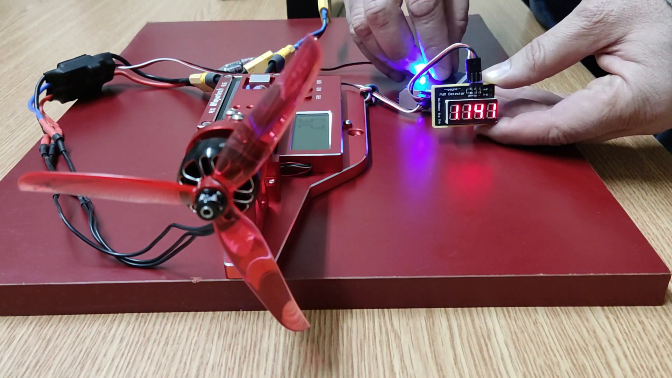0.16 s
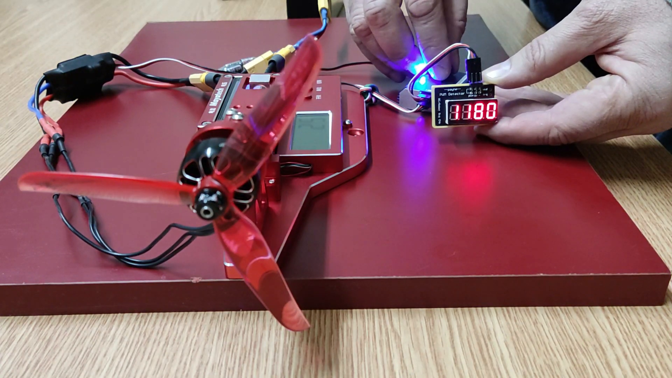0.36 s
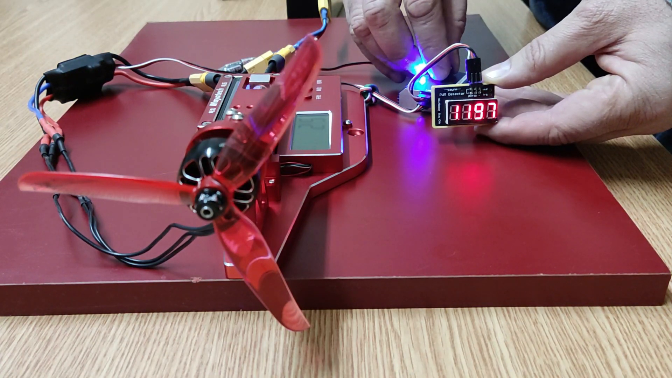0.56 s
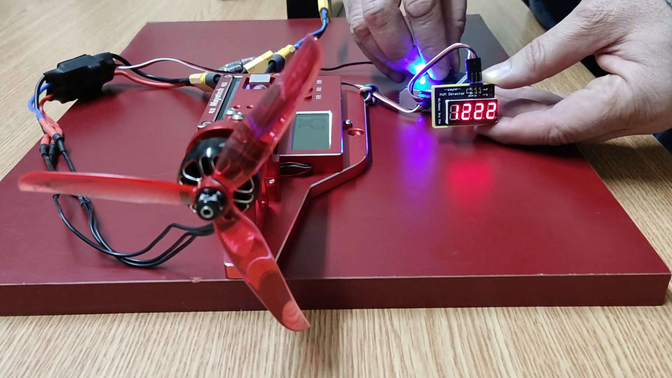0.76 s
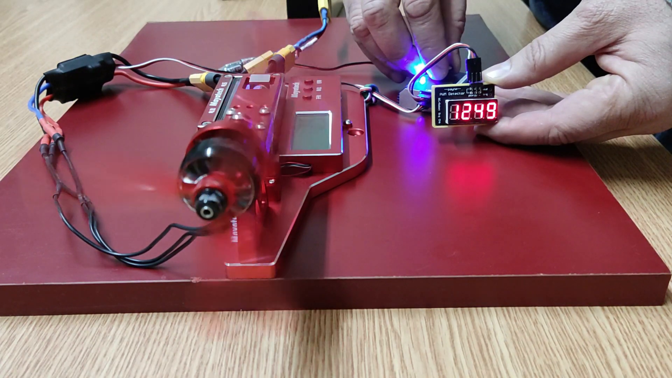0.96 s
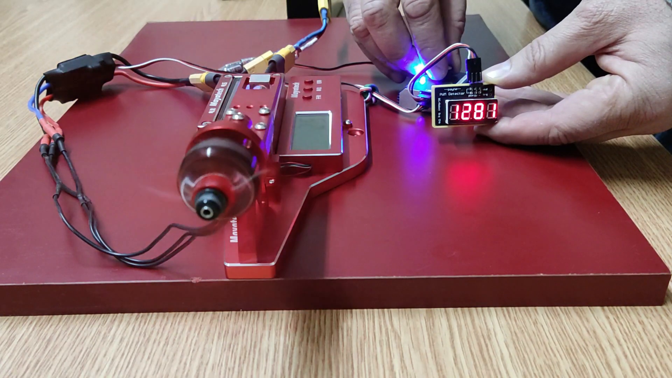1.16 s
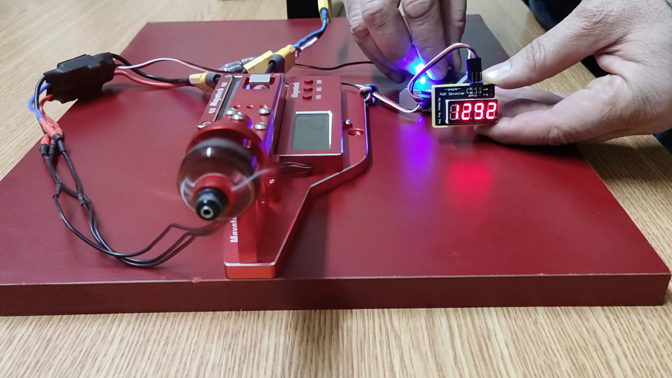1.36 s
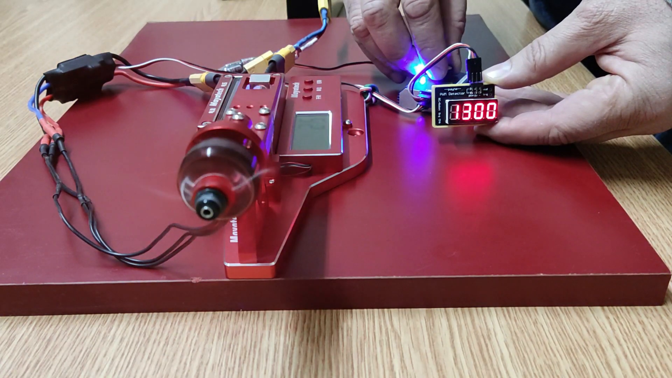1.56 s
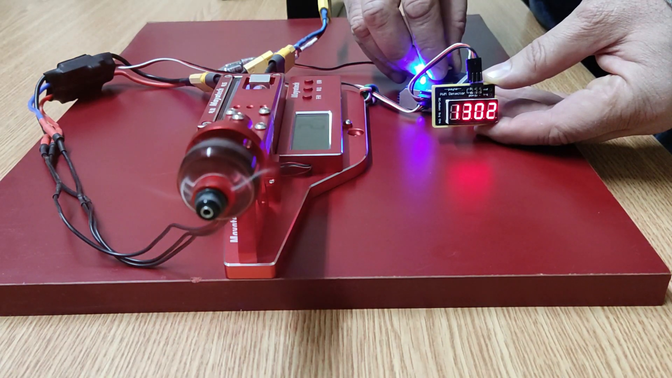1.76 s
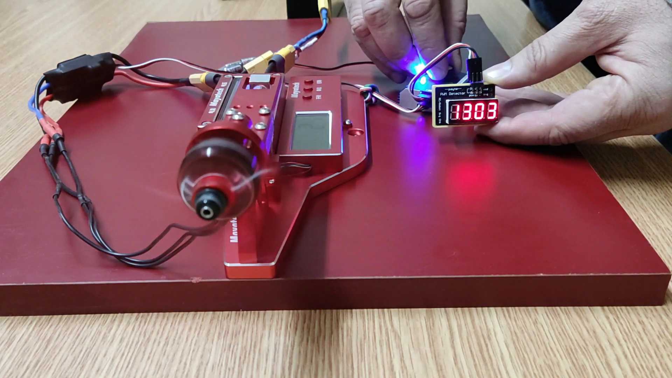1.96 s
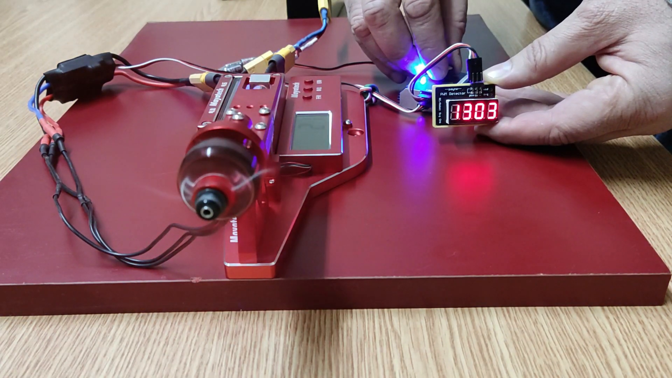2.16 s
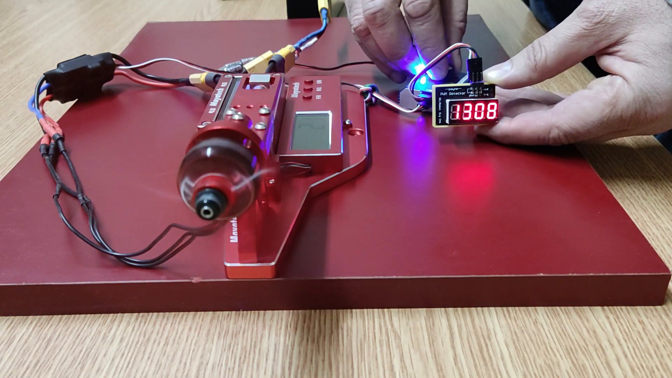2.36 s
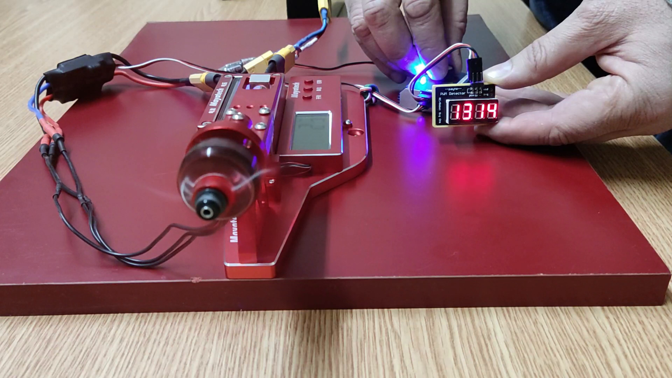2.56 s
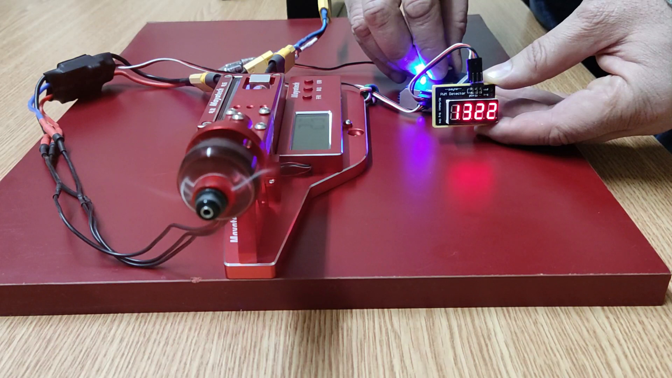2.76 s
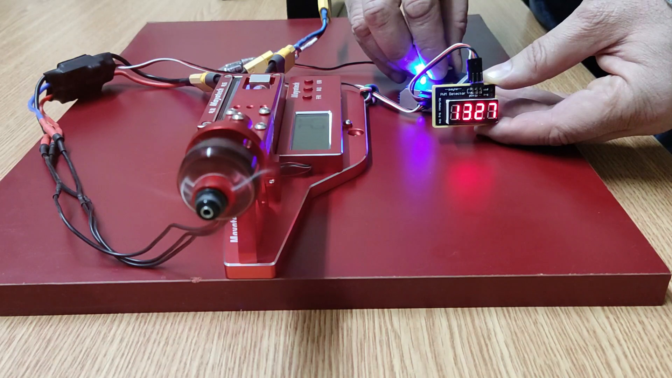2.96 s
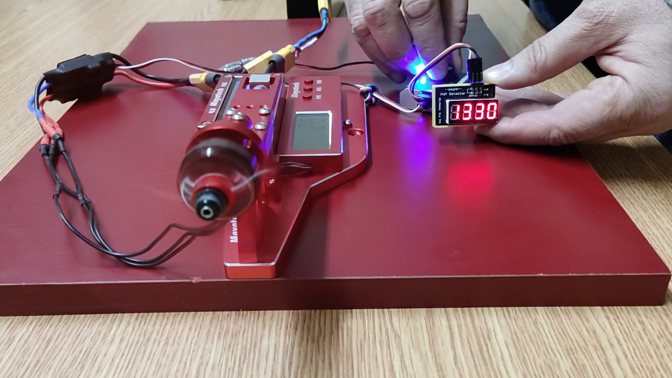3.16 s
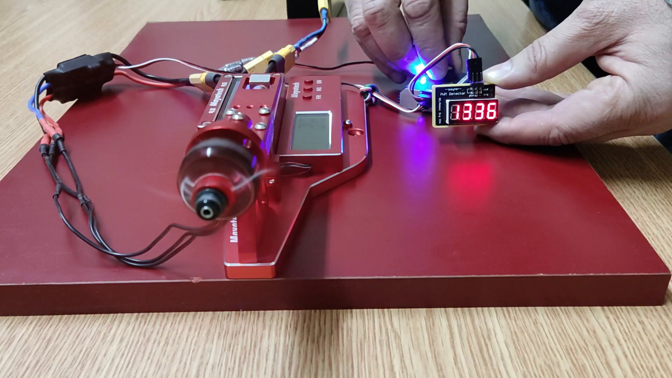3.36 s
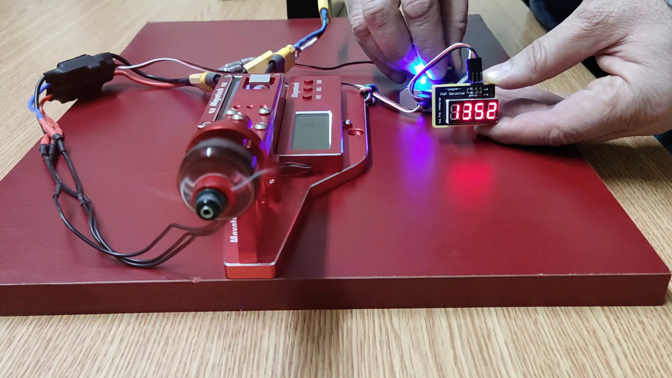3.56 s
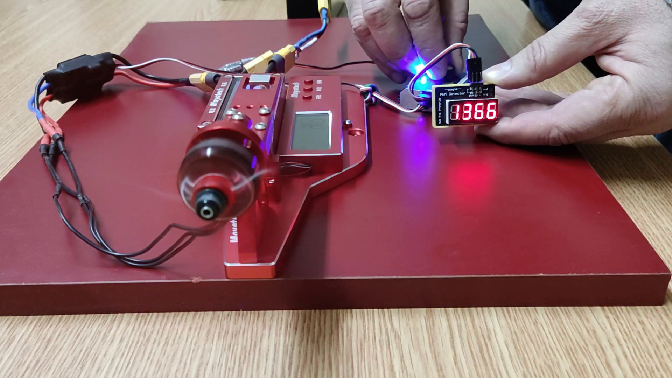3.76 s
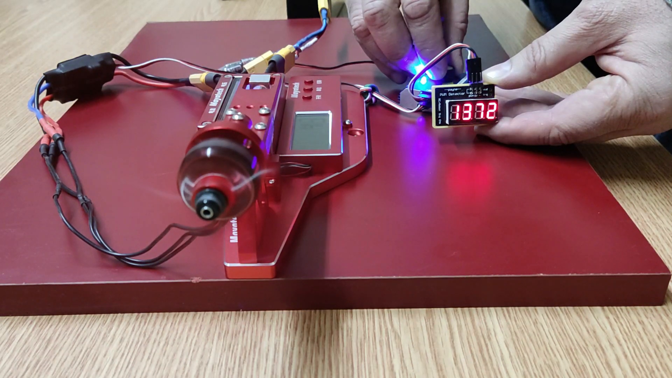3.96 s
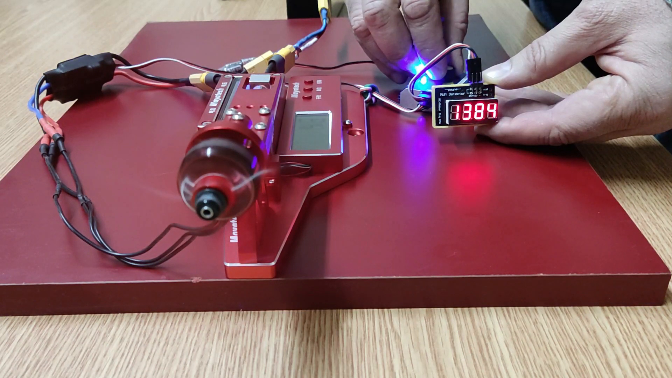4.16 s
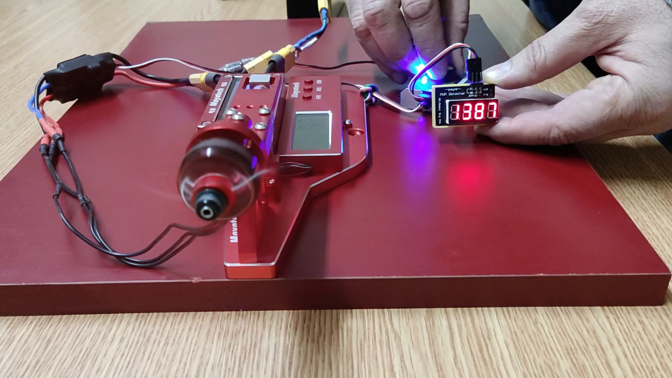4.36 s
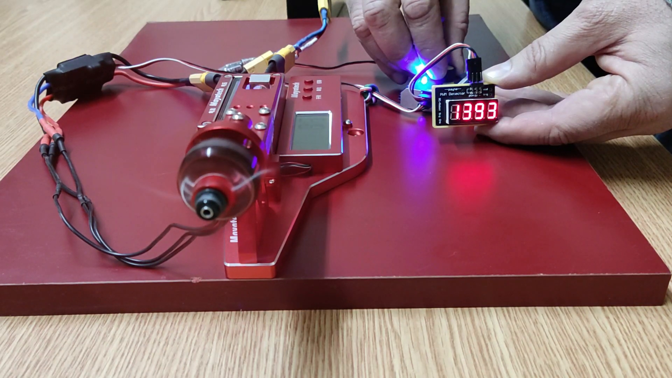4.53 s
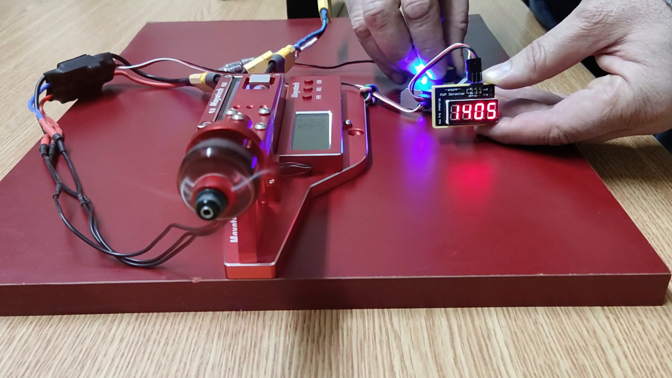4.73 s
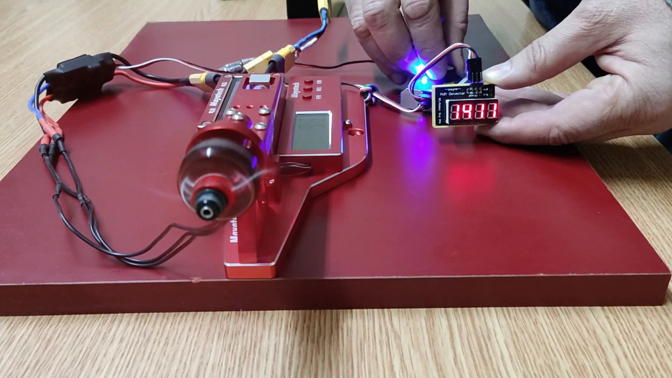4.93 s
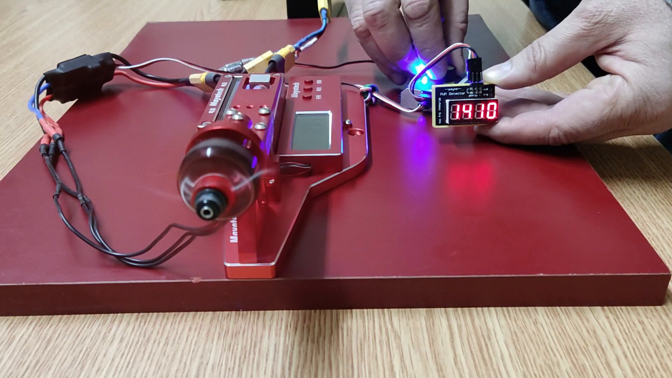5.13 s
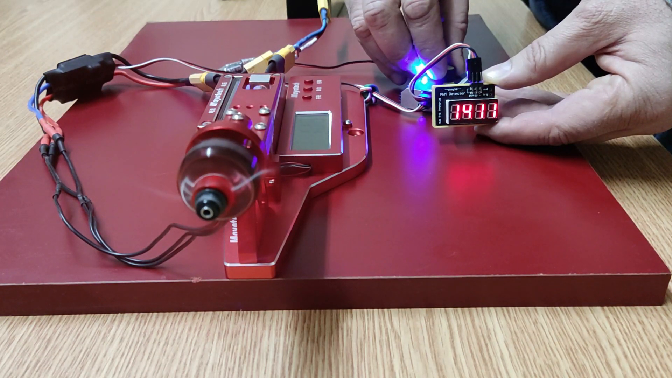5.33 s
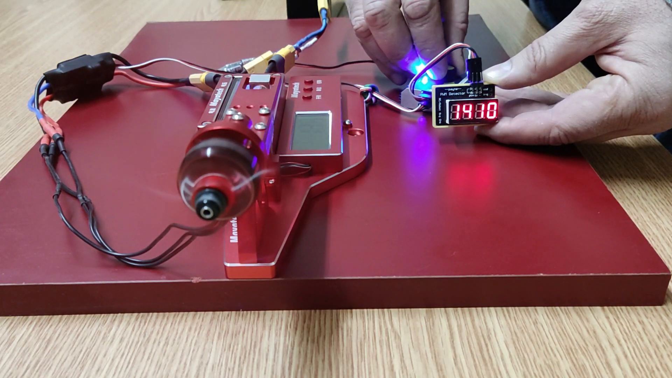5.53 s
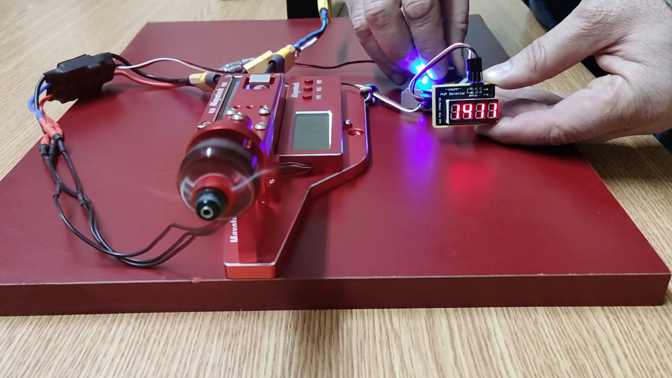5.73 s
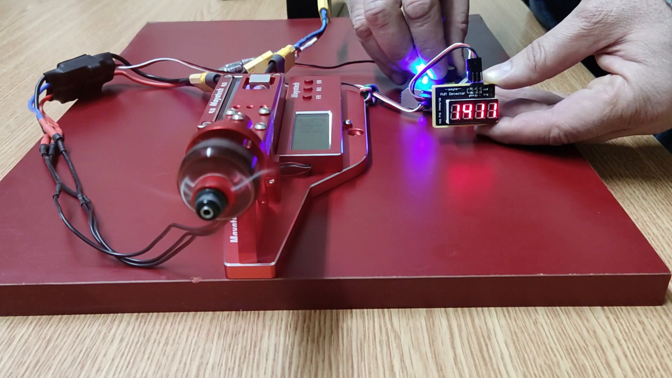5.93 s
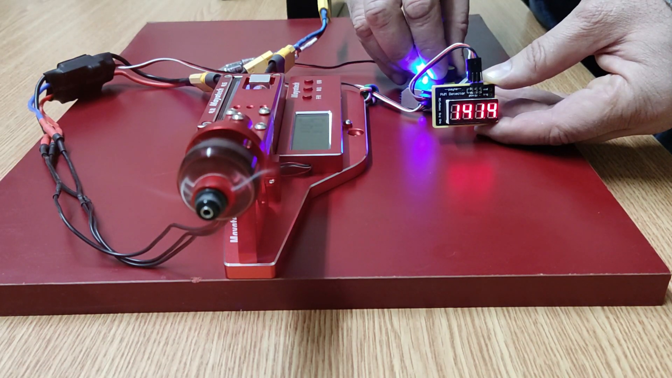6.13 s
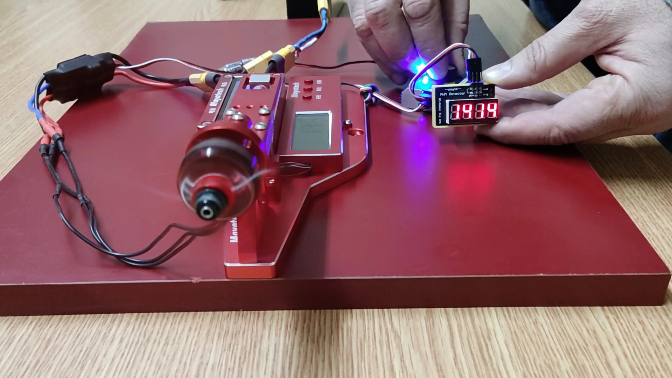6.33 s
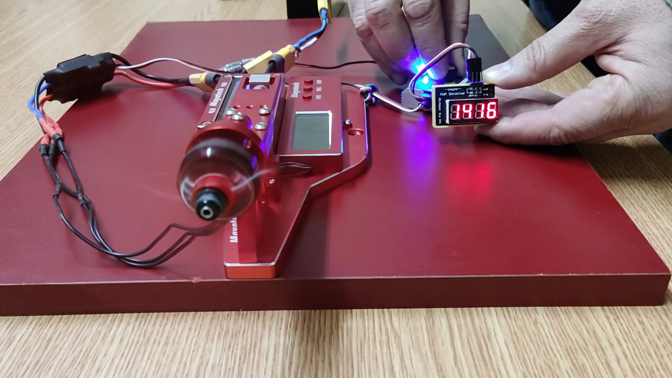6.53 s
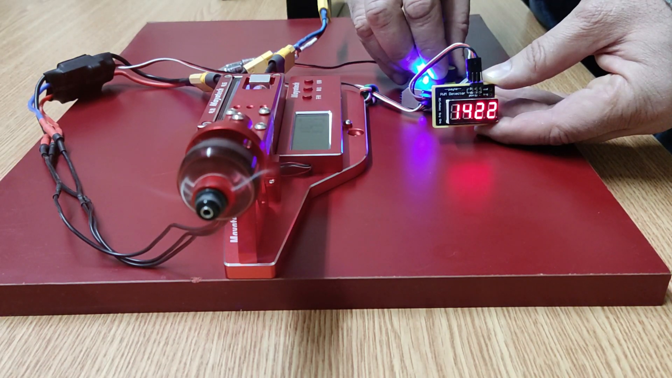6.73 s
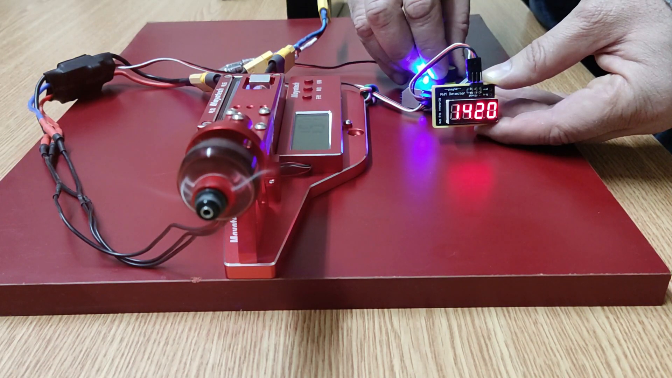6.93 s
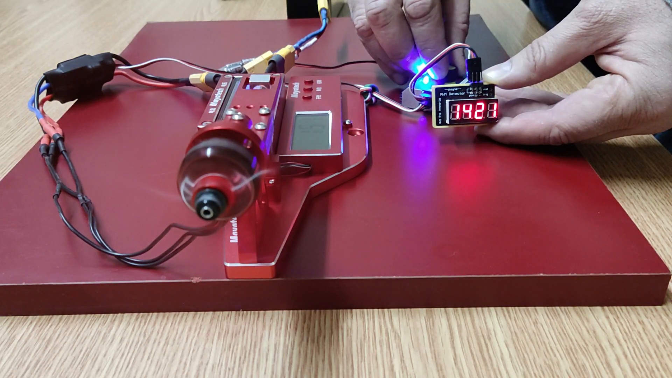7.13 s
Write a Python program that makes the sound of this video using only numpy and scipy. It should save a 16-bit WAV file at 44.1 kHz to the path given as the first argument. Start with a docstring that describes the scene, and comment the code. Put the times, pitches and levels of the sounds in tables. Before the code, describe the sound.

After a second of near-silence, a small brushless motor ticks, stutters, kicks into spin and climbs in steps to a steady, hissing high whine.

```python
"""A small brushless motor with a three-blade propeller on a bench stand in a small room, close to a phone.
It ticks and stutters into step, kicks, overshoots and climbs in stages to a nearly steady speed.
Motor: chopped current whistles with sidebands at multiples of the shaft rate; magnets whine, the bell knocks.
Propeller: blade harmonics hum, and filtered noise gives an air hiss that grows with speed.
Two microphone ports hear it with different delays and levels, over a faint room tone."""
import sys
import numpy as np
from scipy import signal
from scipy.fft import rfft, irfft, next_fast_len
from scipy.io import wavfile
from scipy.ndimage import uniform_filter1d

SR = 44100
rng = np.random.default_rng(int(sys.argv[2]) if len(sys.argv) > 2 else 0)


def inscribe(sig):
    """Save sig as 16-bit PCM at rate SR to the path in sys.argv[1].

    A 1-D sig is mono; a 2-D sig holds one channel per row.
    Samples are clipped to [-1, 1] before scaling.
    """
    pcm = np.round(np.clip(np.atleast_2d(sig).T, -1, 1) * 32767)
    wavfile.write(sys.argv[1], SR, pcm.astype(np.int16))


N = 321489
TIME = np.arange(N) / SR  # s
BINS = np.fft.rfftfreq(N, 1 / SR)  # Hz
POLES, BLADES, STEPS_PER_TURN = 14, 3, 42
# the start: a slow forced ramp, a kick that overshoots, a coast down to the throttle's speed
START_S, KICK_S, COAST_S, SETTLED_S = 1.053, 1.342, 1.365, 1.47
RAMP_HZ, RAMP_CURVE, OVERSHOOT_HZ = 49, .7, 17
# drive current: chopping rate at rest, and its fall in Hz per Hz of shaft speed
SWITCH_HZ, SWITCH_SAG = 7829, .885

# shaft speed under throttle: time_s, speed_hz [s, turns per second]
THROTTLE_SPEED = [(1.52, 60), (1.75, 66.3), (2.0, 71.3), (2.47, 72.74), (2.65, 78), (2.8, 85.4),
                  (2.99, 91.06), (3.17, 94.6), (3.3, 95.56), (3.39, 98.8), (3.5, 101.1), (3.6, 105.7),
                  (3.95, 128.3), (4.02, 132), (4.25, 136.8), (4.35, 139.7), (4.45, 143.4), (4.7, 150.4),
                  (4.85, 158), (4.97, 162.3), (5.2, 164.8), (5.62, 163.9), (5.95, 165.8), (6.1, 165.8),
                  (6.25, 167.8), (6.52, 167.6), (6.82, 172.9), (7.25, 174.5)]


def shaft_speed():
    """Forced ramp, kick and overshoot, then the speed follows the throttle, slightly unsteady."""
    throttle, = curves(THROTTLE_SPEED)
    ramp = RAMP_HZ * np.interp(TIME, [START_S, KICK_S], [0, 1]) ** RAMP_CURVE
    running = throttle + np.interp(TIME, [COAST_S, SETTLED_S], [OVERSHOOT_HZ, 0])
    kicked = np.interp(TIME, [KICK_S, COAST_S], [0, 1])
    return (ramp + kicked * (running - ramp)) * (1 + 0.000396 * wander(14))


# controller stages, each held until the next: start_s, knocking_db, whistle_db, hiss_db [s, dB, dB, dB]
CONTROLLER_STAGES = [(1.054, -43, -63, 0), (1.064, -49, -62, 0), (1.085, -41.5, -67, 0),
                     (1.14, -36.5, -70, 0), (1.158, -31.5, -67, 0), (1.18, -35.5, -78, 0),
                     (1.343, -59, -3.5, -6), (1.348, -26, -0.5, 1.5), (1.365, -39, -10.5, -4.5),
                     (1.448, -36.5, -3.8, -5.5), (1.6, -44, -3, -3.5)]
STAGE_SLEW_S = .003


def staged():
    """Gains of the knocking, the whistle and the hiss: silent at first, then stepping from stage to stage."""
    start_s, *columns = np.transpose(CONTROLLER_STAGES)
    stage = np.searchsorted(start_s, TIME)
    slew = int(STAGE_SLEW_S * SR)
    return [uniform_filter1d(np.append(0, undb(db))[stage], slew) for db in columns]


# switching tone over speed, before the stage gain: speed_hz, level_db, left_minus_right_db [turns/s, dB, dB]
CARRIER_BY_SPEED = [(59, -30, -4), (71.5, -30.5, 3), (87, -25.5, -12.5), (104.05, -19, 8),
                    (120.9, -24.5, 9.5), (126.7, -15.5, 15.5), (139.3, -18.5, 20), (142, -23, 28),
                    (164, -28, 55)]
# throb of the switching tone once a turn: speed_hz, depth [turns per second, 0-1]
THROB_BY_SPEED = [(72, .85), (110, .2)]
# brief dropouts of the switching tone: time_s, half_length_s [s, s]
WHISTLE_DROPOUTS = [(1.705, .009), (1.792, .013), (1.834, .009)]
# weaker sidebands, before the fade with speed: shaft_order, level_db, left_minus_right_db [multiple, dB, dB]
WEAK_SIDEBANDS = [(-28, -43, -4), (-14, -27, -11), (-11, -43, -3), (-3, -29, -9), (3, -37, -9),
                  (6, -37, -7), (8, -39, -16), (10, -40, -8), (11, -30, -16), (12, -38, -9), (13, -35, -10),
                  (17, -41, -6), (28, -44, 0), (39, -38, 12), (42, -26, 15)]
# fade of all sidebands as the throttle opens: speed_hz, gain_db [turns per second, dB]
SIDEBAND_FADE = [(62, 3), (70, 1), (80, -1.5), (135, -1), (150, -7), (174, -13)]
UPPER_DB, UPPER_PAN_DB = -15.5, -16  # loudest sideband, one pole rate above the tone, before the fade
CONTROL_HZ = 3900


def switching(speed, turns, loop_depth=0.19, side_db=0):
    """Chopped drive current sings in the bell; the turning rotor splits it into sidebands."""
    carrier = switching_cycles(speed)
    main_db, main_pan_db = by_speed(CARRIER_BY_SPEED, speed)
    fade_db, = by_speed(SIDEBAND_FADE, speed)
    throb_depth, = by_speed(THROB_BY_SPEED, speed)
    throb = 1 + throb_depth * np.sin(2 * np.pi * turns)
    held = 1 - sum(np.exp(-((TIME - s) / half_s) ** 4) for s, half_s in WHISTLE_DROPOUTS)

    sidebands = pan(UPPER_PAN_DB) * tone(carrier + POLES * turns, UPPER_DB, smear=0.11)
    for order, db, pan_db in WEAK_SIDEBANDS:
        line = pan(pan_db) * tone(carrier + order * turns, db + side_db, smear=0.16)
        # the nearest sidebands drop out together with the tone
        sidebands += line * held if abs(order) <= BLADES else line

    main = pan(main_pan_db) * tone(carrier, main_db, smear=.1) * throb * held
    whistle = radiate(main + undb(fade_db) * sidebands)
    control_ripple = 1 + loop_depth * np.sin(2 * np.pi * CONTROL_HZ * TIME)  # control loop ripples the current
    _, whistle_gain, _ = staged()
    return whistle_gain * whistle * control_ripple


def switching_cycles(speed):
    """Running count of switching cycles; the switching slows a little under load."""
    return np.cumsum(SWITCH_HZ - SWITCH_SAG * speed) / SR


# magnet whine at full speed, before its trim: time_s, level_db [s, dB]
MAGNET_WHINE = [(1.5, -30.5), (2.7, -25), (3.3, -34), (3.8, -28.5), (4.3, -36), (4.75, -21.5),
                (4.86, -25.5), (5.03, -27.5), (5.22, -22.5), (5.3, -26), (5.4, -23.5), (5.66, -28),
                (5.9, -32), (6.0, -24.5), (6.11, -32.5), (6.23, -26.5), (6.55, -27.5), (6.72, -27.5),
                (6.85, -26.5)]
# unevenness of the magnetic pull over one turn, added to the pole tone's neighbours: time_s, gain_db [s, dB]
UNEVEN_PULL = [(3.6, -4), (4.3, -6), (4.8, 2), (5.66, -1.5), (5.74, 8), (6.5, -1.5), (7.29, -10.5)]
# blade and motor harmonics at full speed, before the stand's response: shaft_order, level_db [multiple, dB]
SHAFT_HARMONICS = [(1, -56), (2, -60.5), (3, -42.5), (6, -46), (9, -46), (12, -40.5), (13, -45.5),
                   (15, -36.5), (16, -41.5), (18, -41), (21, -38.5), (24, -39.5), (27, -40.5), (28, -36.5),
                   (29, -42.5), (30, -37), (33, -38.5), (36, -38.5), (39, -43), (42, -34), (70, -46)]
POLE_DB = -1.5  # trim of the magnet whine
POLE_SMEAR, MOTOR_SMEAR = .28, .7
FLUTTER_DB, FLUTTER_HZ = 3, 16  # the uneven pull flutters
WHINE_DIP_S, WHINE_DIP_WIDTH_S, WHINE_DIP_DB = 5.685, 0.019, -35  # the whine dips briefly
FULL_SPEED_HZ = 168
MOTOR_DB_PER_OCTAVE, BLADE_DB_PER_OCTAVE = 12.5, 11.5  # tones grow with speed


def rotor(speed, turns, blade_smear=2.6, blur_hz_per_order=5.5, slow_pan_db=-4, fast_pan_db=2):
    """Harmonics of the shaft: magnet poles whine cleanly, eddies blur the upper blade tones."""
    uneven_db = curves(UNEVEN_PULL)[0] + FLUTTER_DB * wander(FLUTTER_HZ)
    dip_db = WHINE_DIP_DB * np.exp(-((TIME - WHINE_DIP_S) / WHINE_DIP_WIDTH_S) ** 2)
    octaves = np.log2(speed / FULL_SPEED_HZ + 1e-9)
    motor_growth_db, blade_growth_db = MOTOR_DB_PER_OCTAVE * octaves, BLADE_DB_PER_OCTAVE * octaves
    running = np.interp(TIME, [COAST_S, SETTLED_S], [0, 1])  # harmonics fade in during the coast

    whine_db = POLE_DB + curves(MAGNET_WHINE)[0] + dip_db + motor_growth_db
    tones = tone(POLES * turns, whine_db, POLE_SMEAR, smear_hz=90)
    for order, db in SHAFT_HARMONICS:
        # multiples of the blade count, unless on or beside a multiple of the pole rate
        from_blades = order % BLADES == 0 and 2 < order % POLES < POLES - 1
        smear = (blade_smear if from_blades else MOTOR_SMEAR) * min(order / 16, 1) ** 1.65
        smear_hz = max(blur_hz_per_order * order, 70) if from_blades else 70
        db = db + (blade_growth_db if from_blades else motor_growth_db)
        if abs(order - POLES) == 1:  # an uneven pull once a turn puts neighbours beside the pole tone
            db = db + uneven_db + dip_db
        tones += running * tone(order * turns, db, smear, smear_hz)

    sides = pan(np.interp(speed, [90, 130], [slow_pan_db, fast_pan_db]))
    return sides * radiate(tones + bearing(speed, turns))


# high overtones of the magnetic pull: pole_multiple, level_db [multiple of the pole rate, dB]
RISING_OVERTONES = [(4, -40.5), (5, -43), (6, -42), (7, -39.5)]
# sidebands below twice the switching tone: pole_multiple, level_db [multiple of the pole rate, dB]
FALLING_SIDEBANDS = [(1, -55), (3, -49)]
# bell response they sweep through: pitch_hz, half_width_hz, lift_db, left_minus_right_db [Hz, Hz, dB, dB]
BELL_SWEEP = [(4800, 880, -26, 2), (7600, 94, 21, -3), (8520, 93, 17, -24), (11200, 670, 18.5, 28),
              (14700, 1200, -28, 0)]


def overtones(speed, turns):
    """High whines cross, flaring as each meets a resonance of the bell."""
    carrier = switching_cycles(speed)
    rising = sum(tone(k * POLES * turns, db, smear=0.58) for k, db in RISING_OVERTONES)
    falling = sum(tone(2 * carrier - k * POLES * turns, db, smear=0.36) for k, db in FALLING_SIDEBANDS)
    rising_gain = np.interp(speed, [62, 88], [0, 1])
    falling_gain = np.interp(speed, [80, 90], [0, 1])
    return radiate(rising * rising_gain + falling * falling_gain, BELL_SWEEP)


# first jerks of the rotor, before the common lift tick_db: time_s, level_db [s, dB]
ROTOR_TICKS = [(1.056, -31), (1.0825, -35), (1.088, -28), (1.093, -36), (1.1, -28), (1.107, -30),
               (1.114, -24), (1.122, -38), (1.154, -33)]
# resonances of motor bell and mount, relative levels: pitch_hz, width_hz, level_db [Hz, Hz, dB]
BELL_MODES = [(186, 56, -4), (415, 79, -14), (1180, 60, -10), (1670, 25, -1), (2520, 120, -8),
              (3550, 350, -14), (4650, 400, -24), (6000, 150, -17), (7720, 100, 1.5), (8550, 240, -1.5),
              (10750, 310, -6), (11000, 180, -3)]
# magnets' groan during the forced ramp: time_s, level_db [s, dB]
MAGNET_GROAN = [(1.12, -85), (1.15, -58), (1.17, -45), (1.195, -53), (1.23, -54), (1.29, -53), (1.35, -54),
                (1.4, -120)]


def start_up(turns, scatter_db=5, slip=0.14, rattle=0.21, crack=0.02, tick_db=12, pan_db=-4, stutter_db=2.0):
    """Single jerks, then uneven commutation steps, knock the bell; forced current drags the magnets round."""
    t = np.arange(N // 200) / SR
    ring = np.zeros(len(t))
    for hz, width_hz, db in BELL_MODES:
        decay = np.exp(-np.pi * width_hz * t)
        ring += undb(db) * width_hz * decay * np.cos(2 * np.pi * hz * t)
    ring /= np.sqrt(np.sum(ring ** 2))
    ring[0] += crack  # a little of each knock is heard direct

    step_count = np.floor(STEPS_PER_TURN * turns + slip * wander(1200))  # steps come early or late
    steps = np.diff(step_count, prepend=0) * undb(scatter_db * rng.standard_normal(N))
    knocks = steps + rattle * rng.standard_normal((2, N))
    knocks /= np.sqrt(uniform_filter1d(knocks ** 2, size=900) + 1e-12)  # even out, so the stages set the level
    knock_gain, _, _ = staged()
    knocks *= knock_gain * undb(stutter_db * wander(90))  # the rotor catches and slips
    for s, db in ROTOR_TICKS:
        knocks[:, int(s * SR)] += undb(db + tick_db)

    groan = tone(POLES * turns, curves(MAGNET_GROAN)[0], smear=0.62, smear_hz=138.3) * (TIME > START_S)
    return pan(pan_db) * (signal.fftconvolve(knocks, ring[None])[:, :N] + groan)


# air hiss speeds: speed_hz [turns per second], one for each level column below
HISS_SPEED_POINTS = [70, 105, 160]
# hiss of blades and bell, before the stage gain: pitch_hz, slow_db, middle_db, fast_db, left_minus_right_db
# [Hz, then dB per Hz at each of the three hiss speeds, dB]
HISS_SPECTRA = [(30, -81, -83, -83, 21), (79.5, -83.5, -71.5, -74.5, -1), (198, -81, -74.5, -73, -0.5),
                (380, -77.5, -70.5, -71.5, -1), (1060, -79.5, -72, -72.5, 1.5),
                (1900, -83, -66.5, -73.5, -6), (2780, -73, -70, -76.5, -4), (3600, -68.5, -63, -64.5, 4),
                (4230, -71.5, -61.5, -71.5, -7), (6490, -74.5, -59, -60.5, 2.5),
                (7140, -65, -56.5, -57, -15), (8400, -60.5, -48, -47.5, -10), (9540, -69, -58, -55.5, -3.5),
                (10950, -61, -55.5, -50, 19), (12640, -71, -66, -62.5, -4.5), (13400, -92, -68, -65, 3),
                (14200, -78, -72, -65.5, 8), (15900, -84, -78, -74.5, 22)]
HISS_ONSET = [49, 60]  # fade-in range: speed_hz at silence and at full gain [turns per second]


def hiss(speed, turns, shared=0.25, blade_depth=0.049, shaft_depth=0.062):
    """Air tears off the blades, its colour following speed, pulsing with each blade and each turn."""
    hz, *spectra, pan_db = np.transpose(HISS_SPECTRA)
    # the treble reaches each microphone port by its own paths
    likeness = shared * np.interp(BINS, [5000, 9000], [1, .3])
    common, own = rfft(rng.standard_normal(N)), rfft(rng.standard_normal((2, N)))
    noise = irfft(np.sqrt(likeness) * common + np.sqrt(1 - likeness) * own, N)
    blade_pulse = blade_depth * np.sin(2 * np.pi * BLADES * turns)
    shaft_pulse = shaft_depth * np.sin(2 * np.pi * turns)
    noise *= 1 + blade_pulse + shaft_pulse

    sides = pan(over_bins(hz, pan_db))
    air = np.zeros((2, N))
    for db, share in zip(spectra, np.eye(len(spectra))):  # crossfade the spectra by speed
        air += np.interp(speed, HISS_SPEED_POINTS, share) * colour(noise, sides * undb(over_bins(hz, db)))
    flutter_db = .4 * wander(20)
    _, _, hiss_gain = staged()
    onset = np.interp(speed, HISS_ONSET, [0, 1])  # a slow propeller moves hardly any air
    return air * hiss_gain * onset * undb(flutter_db)


# bearing tones, before the stand's response: shaft_order, level_db, gone_hz [multiple, dB, turns per second]
BEARING_TONES = [(13.56, -53, 125), (37.15, -55, 78)]
BEARING_FADE_HZ = 13


def bearing(speed, turns):
    """The bearing sings between the shaft's harmonics at low speed and beats with the magnet whine."""
    song = 0
    for order, db, gone_hz in BEARING_TONES:
        fade = np.clip((gone_hz - speed) / BEARING_FADE_HZ, 0, 1)
        song = song + tone(order * turns, db, smear=0.6) * fade
    return song * (TIME > COAST_S)


def stand(speed, turns, ring_hz=152, width_hz=4, peak_db=-43.5):
    """Unbalance shakes the stand as the shaft rate crosses its resonance."""
    nearness = np.exp(-((speed - ring_hz) / width_hz) ** 2 / 2)
    return tone(turns, peak_db, smear=0.17, smear_hz=29.6) * nearness


# peaks and dips of the stand: pitch_hz, half_width_hz, lift_db, left_minus_right_db [Hz, Hz, dB, dB]
STAND_RESPONSE = [(175, 10, 4.5, -4.5), (420, 36, 5, 3), (597, 13, 8.5, -3), (850, 120, 1.5, 3),
                  (995, 12.5, -6.5, 15), (1186, 18, 11.5, -13), (1160, 125, -4.5, 1.5), (1493, 6, 7, -6),
                  (1697, 25, 6, -3), (1820, 68, -4, 6), (2130, 114, -3, 0.5), (2261, 66, 7, 5),
                  (2569, 19, 6, -9.5), (2613, 67.2, 4.5, 17.5), (3920, 160, 5, -3), (4580, 190, -3, 2),
                  (5870, 260, 0, 0.5), (9136, 78, -14.5, -15), (9450, 103, 13, 12.5), (10340, 160, -10, 1),
                  (11260, 370, 8.5, 11), (12900, 1030, -20.5, 9), (15000, 470, -14, 0)]


def radiate(x, response=STAND_RESPONSE):
    """A gliding tone swells, fades and shifts sideways as it crosses the response's peaks and dips."""
    size = next_fast_len(N + SR // 4)
    bins = np.fft.rfftfreq(size, 1 / SR)
    lift_db, pan_db = np.zeros(len(bins)), np.zeros(len(bins))
    for hz, half_width_hz, db, side_db in response:
        nearness = 1 / (1 + ((bins - hz) / half_width_hz) ** 2)
        lift_db += db * nearness
        pan_db += side_db * nearness
    return irfft(rfft(x, size) * undb(lift_db) * pan(pan_db), size)[:, :N]


def ports(x, lag_s):
    """The left microphone port is further away and hears it later, by a lag finer than a sample."""
    late = np.arange(-16, 32) - lag_s * SR
    windowed_sinc = np.sinc(late) * np.sinc(late / 16)
    left = np.convolve(x[0], windowed_sinc)[16:N + 16]
    return np.array([left, x[1]])


def room(x, t60=0.13, wet_db=-14):
    """Bench and near walls add a short diffuse tail, different at each port."""
    t = np.arange(SR // 3) / SR
    decay = np.exp(-np.log(1000) * t / t60)  # 60 dB down after t60 seconds
    tail = rng.standard_normal((2, len(t))) * decay * (t > .002)
    tail /= np.sqrt(np.sum(tail ** 2, axis=1, keepdims=True))
    return x + undb(wet_db) * signal.fftconvolve(x, tail, axes=1)[:, :N]


# quiet room: pitch_hz, level_db [Hz, dB per Hz]
ROOM_SPECTRUM = [(25, -74), (120, -93), (200, -93), (400, -98), (1000, -106.5), (3000, -110), (7000, -113),
                 (8100, -112), (8650, -105.5), (9300, -113), (11500, -112), (13000, -121), (15500, -128)]
HUM_HZ, HUM_DB = 503, -83  # a faint steady hum in the room


def room_tone():
    """Faint steady rumble, hum and hiss, partly common to both sides."""
    hz, db = np.transpose(ROOM_SPECTRUM)
    noise = (rng.standard_normal(N) + rng.standard_normal((2, N))) / np.sqrt(2)
    hum = tone(HUM_HZ * TIME, HUM_DB, smear=0.27, smear_hz=13)
    return colour(noise, undb(over_bins(hz, db))) + hum


def tone(turns, db, smear, smear_hz=60):
    """A line of given rms level; a share of it wavers in size and phase."""
    angle = 2 * np.pi * (turns + rng.random())
    in_phase = (1 + smear * wander(smear_hz)) * np.sin(angle)
    quadrature = smear * wander(smear_hz) * np.cos(angle)
    return undb(db) * (in_phase + quadrature) * np.sqrt(2 / (1 + 2 * smear ** 2))


def wander(rate):
    """Random levels, rate per second, joined by lines; spread near 1; the last is held if they run out."""
    points = rng.standard_normal(N // 50)
    return np.sqrt(3 / 2) * np.interp(TIME * rate, np.arange(len(points)), points)


def colour(noise, gain):
    """Gives white noise a spectrum, as gain per root hertz."""
    return irfft(rfft(noise) * gain, N) * np.sqrt(SR / 2)


MAX_PAN_DB = 16


def pan(db):
    """Left and right gains that keep the mean power, from left minus right in dB."""
    ratio = undb(np.clip(np.atleast_1d(db), -MAX_PAN_DB, MAX_PAN_DB))
    return np.array([ratio, np.ones_like(ratio)]) * np.sqrt(2 / (1 + ratio ** 2))


def undb(db):
    """Decibels to gain."""
    return 10 ** (np.asarray(db) / 20)


def curves(table):
    """Each column of a time table, at every sample."""
    s, *columns = np.transpose(table)
    return [np.interp(TIME, s, c) for c in columns]


def by_speed(table, speed):
    """Each column of a speed table, at every sample."""
    hz, *columns = np.transpose(table)
    return [np.interp(speed, hz, c) for c in columns]


def over_bins(hz, values):
    """Points joined on a log-frequency axis."""
    return np.interp(np.log(BINS + 1), np.log(hz), values)


PROPELLER_LAG_S, BELL_LAG_S = .000147, .000125  # left port behind right


def scene():
    """One shaft drives the motor and propeller layers; the room adds its tail and tone."""
    speed = shaft_speed()
    turns = np.cumsum(speed) / SR
    bell = switching(speed, turns) + overtones(speed, turns) + start_up(turns)
    propeller = rotor(speed, turns) + stand(speed, turns) + hiss(speed, turns)
    at_phone = ports(bell, BELL_LAG_S) + ports(propeller, PROPELLER_LAG_S)
    return room(at_phone) + room_tone()


TOP_HZ = 15800


def record(dry):
    """The phone cuts the top with a steep low-pass."""
    low_pass = signal.ellip(10, .1, 80, TOP_HZ, fs=SR, output="sos")
    return signal.sosfilt(low_pass, dry)


dry = scene()
out = record(dry)
inscribe(out)
```